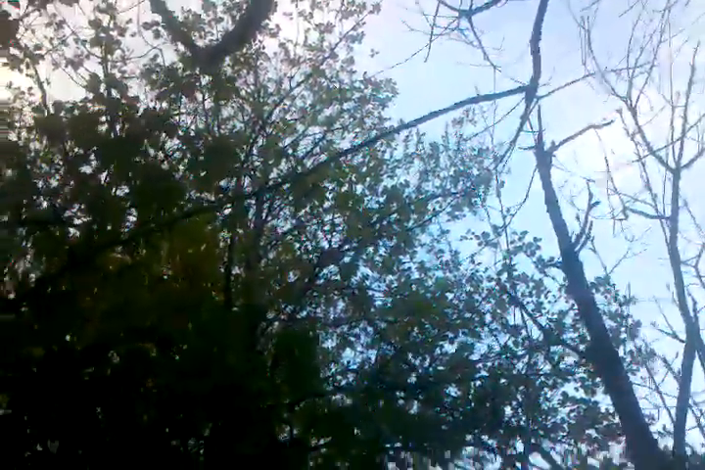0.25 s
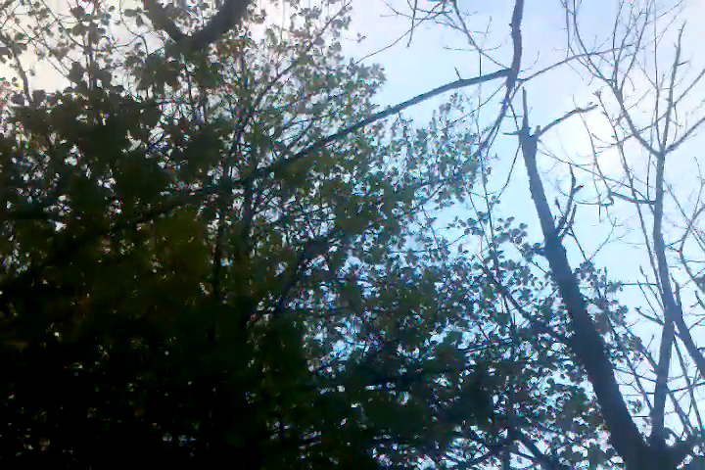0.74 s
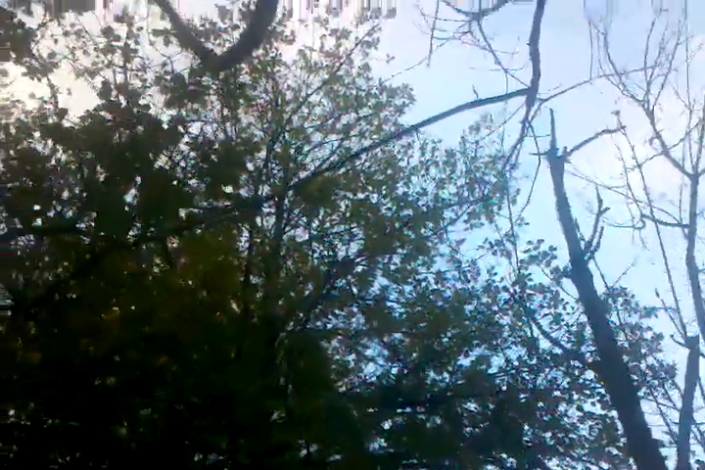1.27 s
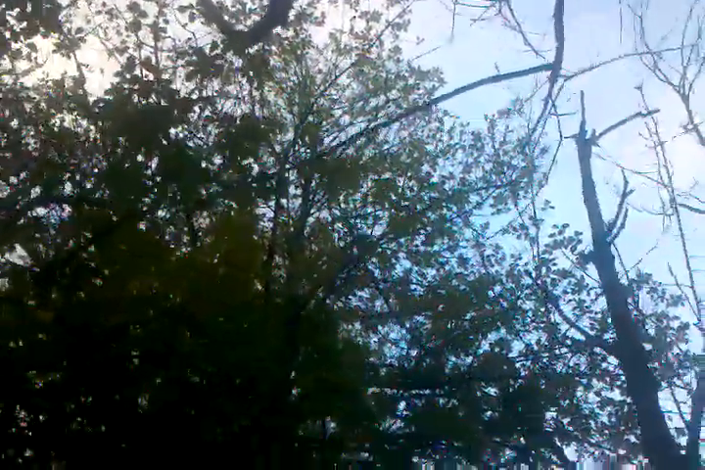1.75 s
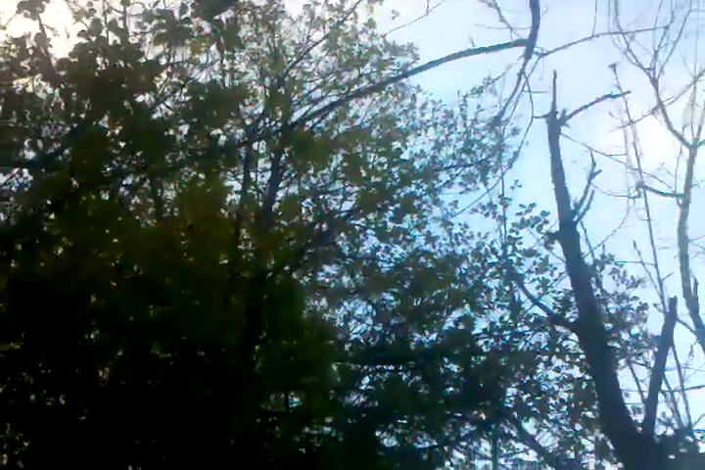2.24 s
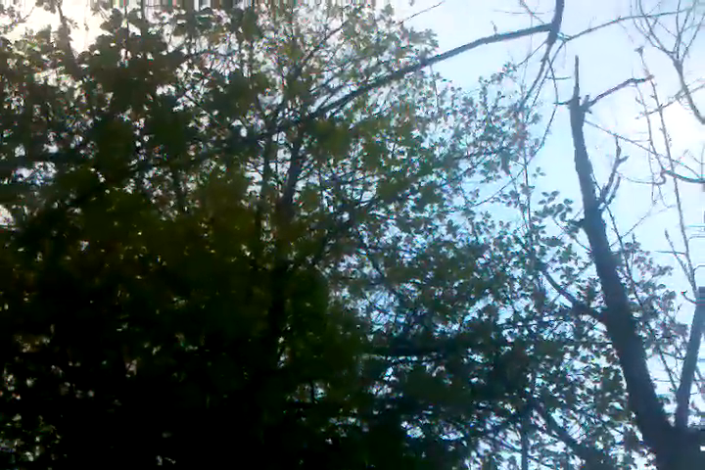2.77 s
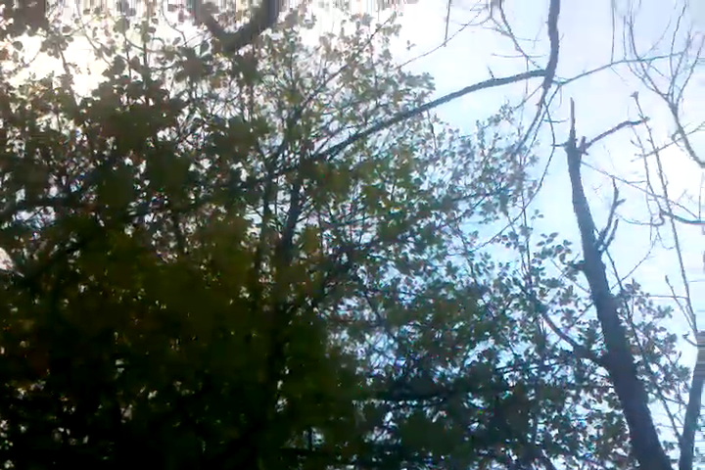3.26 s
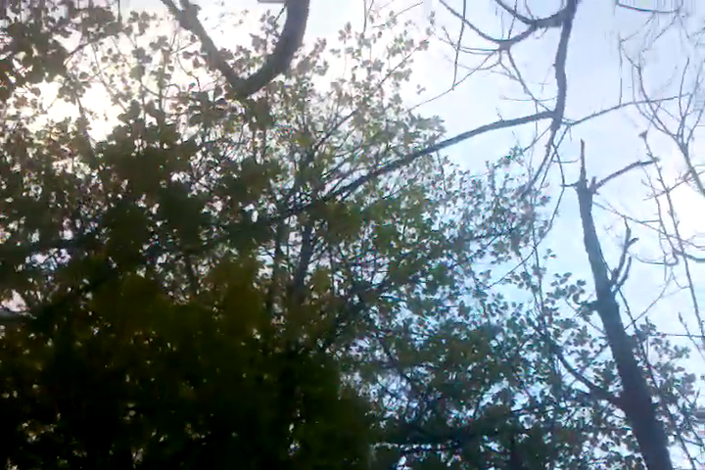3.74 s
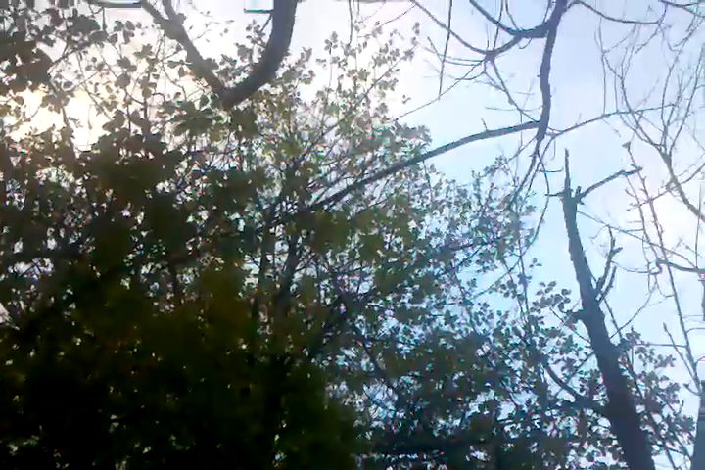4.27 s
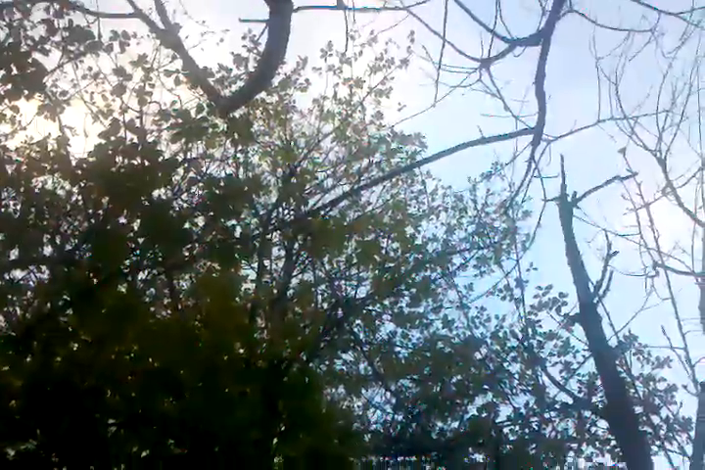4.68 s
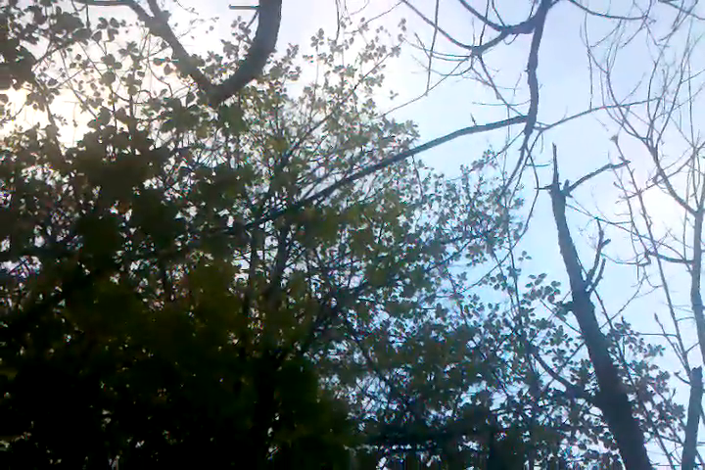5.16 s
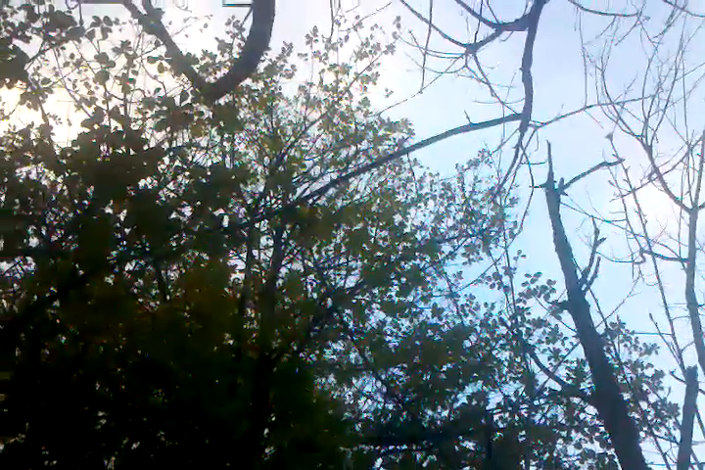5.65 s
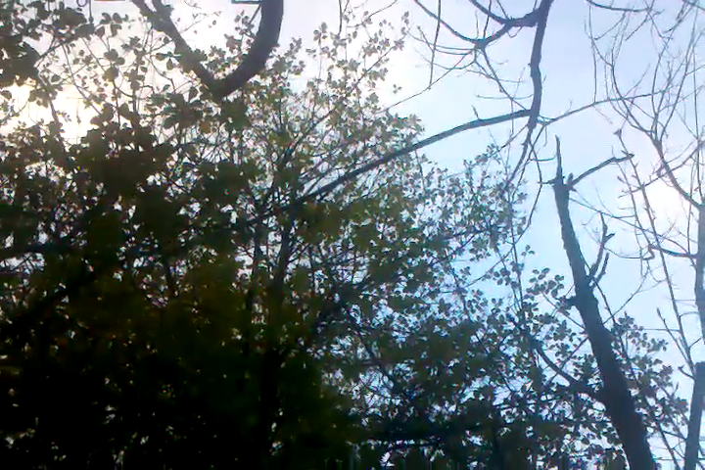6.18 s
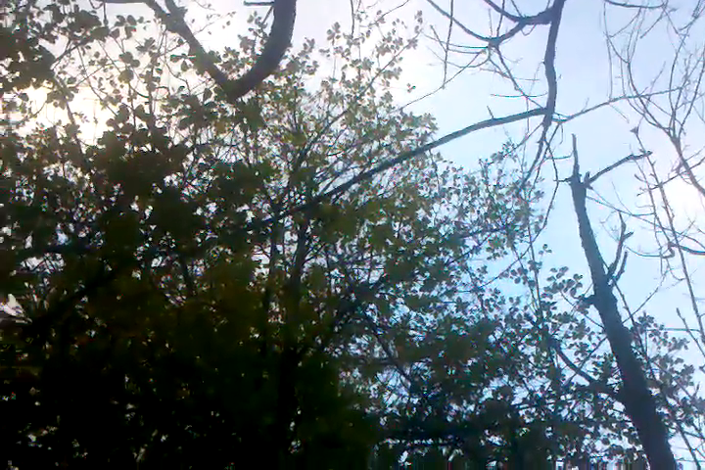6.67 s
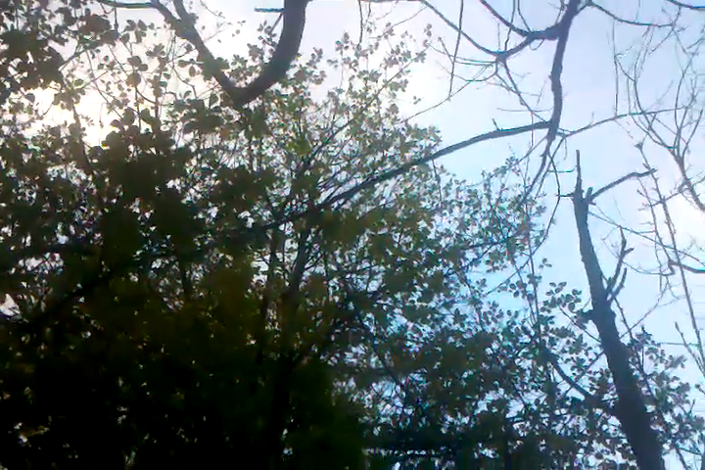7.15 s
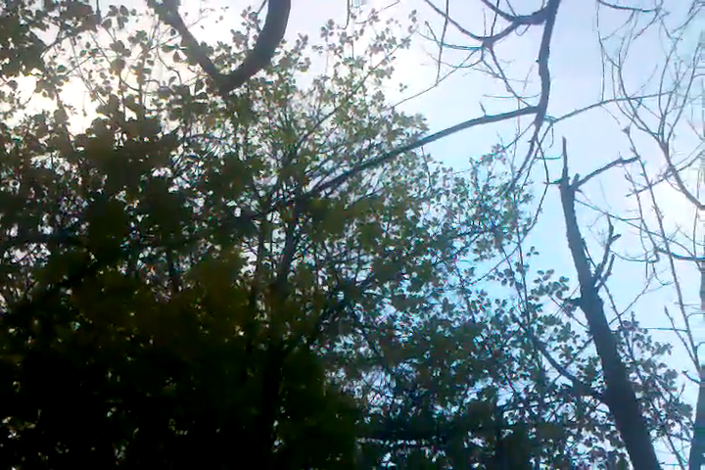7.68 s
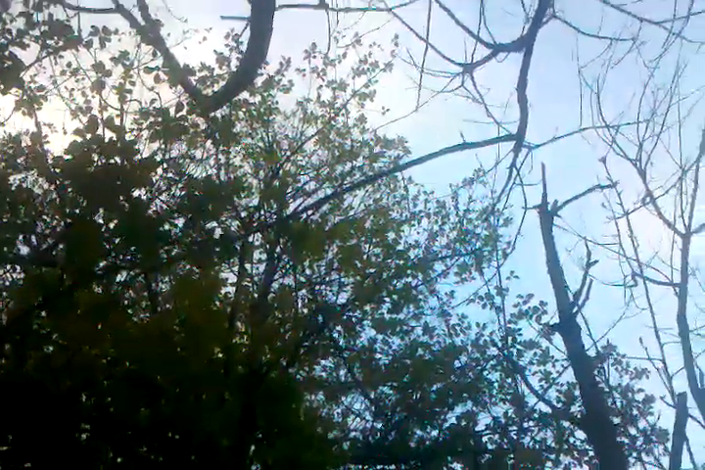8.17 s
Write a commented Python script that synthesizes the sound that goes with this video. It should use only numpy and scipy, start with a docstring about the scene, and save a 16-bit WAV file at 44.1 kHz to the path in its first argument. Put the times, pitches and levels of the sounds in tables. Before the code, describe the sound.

A mockingbird sings close by in a street tree: evenly spaced arched chirps, a pause, quick pairs of throaty buzz and falling sweep, higher steeper pairs, two rapid trills, then separate whistles. Other birds chirp faintly and echo from further off, and a few dry ticks fall close to the microphone. Steady distant traffic rushes throughout over deep rumble and a weak wavering hum.

```python
"""A mockingbird in a street tree sings arches, then pairs of a low buzz and a sweep, pairs of a steep buzz
and a sweep, two trills and last a row of whistles; soft notes join in from the steep pairs on.
Two other birds call from further off and dry ticks fall close by; foliage and houses echo them.
Throughout, far traffic rushes over a deep rumble and a wavering mains hum.
Birds are gliding sines, ticks damped cosines, traffic and rumble filtered noise, the hum a sine."""
import sys
import numpy as np
from scipy import signal
from scipy.fft import rfft, irfft
from scipy.io import wavfile
from scipy.ndimage import uniform_filter1d

SR = 44100
rng = np.random.default_rng(int(sys.argv[2]) if len(sys.argv) > 2 else 0)


def output_pcm(signal):
    """Save a mono or channel-first signal as 16-bit PCM at the path in sys.argv[1].

    Samples are clipped to [-1, 1] before scaling.
    """
    pcm = np.clip(np.atleast_2d(signal).T, -1, 1) * 32767
    wavfile.write(sys.argv[1], SR, np.round(pcm).astype(np.int16))


N = 371322
T = np.arange(N) / SR
TOP_HZ = 6780  # traffic spectrum is flat above; steep low-pass starts here
PLAIN = [(1, 0), (2, -13.5)]  # tone and octave: multiple, level/dB
# throat resonance: f/Hz, level/dB
THROAT = [(1800, -2), (2500, -2), (3500, -1.5), (4000, -1), (4800, 1), (5400, -4.5), (6000, -2.5),
          (7000, -9.5), (8200, -13.5)]


def undb(db):
    """Amplitude ratio of a level in dB."""
    return 10 ** (np.asarray(db) / 20)


def unit(x):
    """Scale to rms 1."""
    return x / np.sqrt(np.mean(x ** 2))


def colour(table, hz):
    """dB of a spectrum table at hz, straight on a log axis."""
    table_hz, table_db = np.transpose(table)
    return np.interp(np.log(hz), np.log(table_hz), table_db)


def walk(rate_hz):
    """Smooth random curve, rms 1, that turns about rate_hz times a second."""
    k = max(int(SR / rate_hz), 1)
    steps = np.repeat(rng.standard_normal(N // k + 1), k)
    return unit(uniform_filter1d(uniform_filter1d(steps, k), k)[:N])


def band(lo_hz, hi_hz):
    """Noise between two edges, rms 1."""
    sos = signal.butter(2, [lo_hz, hi_hz], "band", fs=SR, output="sos")
    return unit(signal.sosfilt(sos, rng.standard_normal(N)))


def echoes(x, near_db, near_t60_s, far_db, far_t60_s):
    """Scattered returns from leaves close by, then a longer wash from the houses."""
    t = T[:SR]
    leaves, houses = rng.standard_normal((2, SR)) * np.clip(t / 0.0007, 0, 1)
    leaves = leaves * undb(-60 * t / near_t60_s)
    houses = houses * undb(-60 * t / far_t60_s)
    room = undb(near_db) * leaves / np.linalg.norm(leaves) + undb(far_db) * houses / np.linalg.norm(houses)
    return signal.fftconvolve(x, room)[:N]


def sing(out, rows, partials, throat, shake, rough, fade_s=0.0011):
    """Add a syrinx tone along rows (t/s, f/Hz, level/dB); roughness shakes its pitch and makes it throb."""
    # throbs quicken with pitch: pitch/Hz, throb rate/Hz
    throb_rates = [(3100, 90), (4200, 210)]
    pitch_shake, throb_shake = shake
    s, hz, db = np.transpose(rows)
    i = np.arange(int(s[0] * SR), min(int(s[-1] * SR), N))
    hz = np.interp(T[i], s, hz)
    throb_hz = np.interp(hz, *np.transpose(throb_rates)) * (1 + .15 * throb_shake[i])
    beat = 2 * np.pi * np.cumsum(throb_hz) / SR
    throb = 1 - np.clip(1.3 * rough, 0, 1) * (1 + np.cos(beat)) / 2
    edge = np.clip(np.minimum(T[i] - s[0], s[-1] - T[i]) / fade_s, 0, 1)
    gain = np.sqrt(2) * undb(np.interp(T[i], s, db)) * throb * edge
    phase = 2 * np.pi * np.cumsum(hz * (1 + .04 * rough * pitch_shake[i])) / SR
    for multiple, part_db in partials:
        out[i] += gain * undb(part_db + colour(throat, multiple * hz)) * np.sin(multiple * phase)


def glide(s, ms, hz0, hz1, db, loudest, ends_db):
    """Rows of a glide that moves fastest early; level curves by ends_db away from the part called loudest."""
    u = np.linspace(0, 1, num=9)
    return np.c_[s + u * ms / 1000, hz0 + (hz1 - hz0) * u ** .8, db + ends_db * (2 * (u - loudest)) ** 2]


def traffic():
    """Noise in half-octave bands that each swell and flicker on their own."""
    # relative density: f/Hz, level/dB
    density = [(18, -55.5), (30, -36), (65, -20), (98, -7.5), (123, 0), (250, -0.5), (532, -5), (984, -0.5),
               (1660, -5.5), (2240, -13.5), (3780, -14), (5570, -15.5), (7000, -19.5), (9100, -52),
               (15400, -120)]
    # rms of the 300-1800 Hz part before slow level changes: t/s, level/dB
    rush_level = [(0.0, -43), (1.43, -41), (1.76, -40.5), (5.09, -42), (7.29, -39.5), (7.76, -40.5),
                  (8.42, -40.5)]
    hz = np.maximum(np.arange(N // 2 + 1) * SR / N, 1)
    spectrum = rfft(rng.standard_normal(N)) * undb(colour(density, np.minimum(hz, TOP_HZ)))
    rush = 0
    for centre_hz in 30 * 2 ** np.arange(0, 8.5, .5):
        share = np.clip(1 - 2 * np.abs(np.log2(hz / centre_hz)), 0, 1)  # triangle, overlaps sum to 1
        rush = rush + irfft(spectrum * share, N) * undb(1.29 * walk(2.997) + 0.54 * walk(14))
    middle = signal.sosfilt(signal.butter(4, [300, 1800], "band", fs=SR, output="sos"), rush)
    return rush / np.std(middle) * undb(np.interp(T, *np.transpose(rush_level)))


def rumble():
    """Deep noise band whose level rises and sinks."""
    # t/s, level/dB
    rumble_level = [(0.0, -76), (0.14, -78), (5.25, -75.5), (6.19, -63.5), (6.82, -75), (7.55, -68),
                    (8.35, -74), (8.42, -67)]
    return band(50, 80) * undb(np.interp(T, *np.transpose(rumble_level)))


def hum():
    """Mains hum: one sine, wavering in pitch and level."""
    mean_hz, mean_db = 117.5, -58
    phase = 2 * np.pi * np.cumsum(mean_hz + 2.67 * walk(9)) / SR
    return np.sqrt(2) * undb(mean_db + 1.9 * walk(8.6)) * np.sin(phase)


def ticks():
    """Small dry ticks close by, each a single push that rings a very short resonance."""
    # t/s, peak before high-pass/dB, f/Hz, damping/Hz (decay rate is 1.5 times this, per s)
    tick_rows = [(0.3583, -15.5, 1000, 1700), (0.3838, -18.5, 4500, 2500), (4.451, -8, 1490, 3000),
                 (6.2355, -15, 4400, 5000), (6.9309, -20.5, 900, 800), (7.0483, -15, 2500, 5000),
                 (7.1628, -24, 6000, 2500), (7.2836, -21, 3300, 2200)]
    out, t = np.zeros(N), T[:400]
    for s, db, hz, damping_hz in tick_rows:
        i = int(s * SR)
        out[i:i + len(t)] += undb(db) * np.exp(-1.5 * t * damping_hz) * np.cos(2 * np.pi * hz * t)
    out = signal.sosfilt(signal.butter(2, 350, "high", fs=SR, output="sos"), out)  # too small to give bass
    return out + echoes(out, -8, .012, -18, .2)


def low_chirps(shake):
    """A neighbour's low chirps, held and then dropped, with strong echo."""
    # t/s, length/ms, held f/Hz, level before throat/dB
    chirps = [(3.927, 28, 2380, -36), (4.155, 30, 2305, -38), (4.73, 33.4, 2465, -32.5),
              (4.945, 26, 2254, -38), (5.554, 29, 2440, -37), (5.795, 56, 2330, -37.5),
              (6.334, 34, 2464, -34.5), (6.928, 42, 2440, -38)]
    # part of length, pitch ratio, level/dB
    chirp_shape = [(-.3, .85, -17), (0, .94, -9), (.3, 1., 0), (.65, 1., -1), (1, .83, -5)]
    out = np.zeros(N)
    part, ratio, shape_db = np.transpose(chirp_shape)
    for s, ms, hz, db in chirps:
        rows = np.c_[s + part * ms / 1000, hz * ratio, db + shape_db]
        sing(out, rows, [(1, 0), (2, -12)], THROAT, shake, .6)
    return out + echoes(out, -.5, .18, -4, .6)


def far_bird(shake):
    """Far chirps and hoarse slides; patchy in level, with more echo than direct sound."""
    # t of crest/s, level before throat/dB
    far_chirps = [(0.784, -39.5), (2.214, -41), (2.31, -45), (3.37, -38.5), (4.651, -36.5), (5.555, -34.5),
                  (7.724, -32.5)]
    # t from crest/ms, f/Hz, level/dB
    far_shape = [(-22, 4200, -17), (0, 5650, -1), (8, 4550, -6), (23, 4250, 0), (36, 4000, -7),
                 (52, 3800, -3), (70, 3400, -7), (82, 3700, -9)]
    # second voice above the fall: length/ms, start f/Hz, end f/Hz, level/dB
    upper_voice = (45, 5501.5, 4997, -6)
    # hoarse slides: t/s, length/ms, start f/Hz, end f/Hz, level before throat/dB
    far_calls = [(0.589, 320, 6610, 5950, -47.5), (.62, 140, 5700, 4940, -45), (.85, 110, 3800, 3710, -45),
                 (2.25, 130, 4110, 3620, -48.5), (3.41, 64, 4230, 3600, -43), (7.759, 50, 4290, 3970, -44),
                 (8.15, 77, 3640, 2526, -48.5)]
    chirps, slides = np.zeros(N), np.zeros(N)
    ms, hz, shape_db = np.transpose(far_shape)
    *upper_glide, upper_db = upper_voice
    slide_rows = [glide(*call, .3, -4) for call in far_calls]
    for s, db in far_chirps:
        rows = np.c_[s + ms / 1000, hz, db + shape_db]
        sing(chirps, rows, [(1, 0)], THROAT, shake, .75, fade_s=.003)
        slide_rows.append(glide(s, *upper_glide, db + upper_db, .3, -4))
    for rows in slide_rows:
        sing(slides, rows, [(1, 0)], THROAT, shake, 0, fade_s=.006)
    slides = slides * (.4 + .9 * walk(2000))  # hoarse: spread into a band of noise
    out = (chirps + slides) * undb(2.5 * walk(90))  # broken into patches
    return out + echoes(out, 0.92, 0.098, -0.5, .45)


def other_birds():
    """Two further singers that reach the street mostly as echo."""
    shake = walk(300), walk(60)
    return low_chirps(shake) + far_bird(shake)


def arch(s, rise_ms, hold_ms, fall_ms, hz0, drift_hz, db):
    """Rows of an arch: quick rise, slightly domed hold, deep fall."""
    # part of the rise, pitch ratio, level/dB
    rise_shape = [(-1, .7, -9), (-.5, .82, -6.5), (0, 1., 1.5)]
    # part of the fall, pitch ratio, level/dB
    fall_shape = [(0, .985, 1.5), (.22, .95, .8), (.62, .69, -1.5), (1, .44, -7)]
    hz1 = hz0 + drift_hz
    up = [(s + part * rise_ms / 1000, hz0 * ratio, db + part_db) for part, ratio, part_db in rise_shape]
    dome = [(s + hold_ms / 2000, 1.025 * (hz0 + hz1) / 2, db)]
    down = [(s + (hold_ms + part * fall_ms) / 1000, hz1 * ratio, db + part_db)
            for part, ratio, part_db in fall_shape]
    return up + dome + down


def arches(out, shake):
    """Arched notes: harmonics 2 to 5 of a fundamental that is itself absent."""
    # t where rise levels off/s, rise/ms, hold/ms, fall/ms, lower tone f/Hz, drift over hold/Hz,
    # level before throat/dB, upper tone (a fifth above)/dB
    arch_rows = [(.094, 11, 9.1, 30, 2710, 46, -36.5, -.6), (.25, 11, 7.7, 20.5, 2705, 58, -38.5, -2),
                 (0.409, 14, 10.5, 27, 2666, 42.5, -36, 2), (0.562, 10.3, 11, 30, 2914, -60.5, -34, -2.5),
                 (.718, 14, 11, 22, 2830, 40, -33.5, -2), (.898, 8, 12.4, 31, 3090, 61, -34, -9.5),
                 (1.075, 13.2, 17, 30, 3190, 32, -34, 2.5), (1.227, 16, 15.5, 33, 3090, 81, -32, 1),
                 (1.407, 18, 16, 26, 3156, 70, -32, 2.5), (1.581, 18.6, 18.8, 23.5, 3525, 235.5, -29, -1),
                 (1.749, 17, 15.3, 21, 3540, -230, -27.5, 3.5),
                 (1.938, 22.5, 13.8, 30, 3113, 100, -32.5, 0.8),
                 (2.118, 21.5, 13.6, 34, 3110, 130, -35.5, 1.1)]
    # narrower throat resonance: f/Hz, level/dB
    arch_throat = [(1700, -19), (2200, -7), (2800, -1.5), (3600, 0), (4250, -3), (4800, -16), (5500, -20),
                   (6500, -10), (8000, -16)]
    high_db = -4.5
    for *shape, upper_db in arch_rows:
        partials = [(1, 0), (3 / 2, upper_db), (2, high_db), (5 / 2, high_db)]
        sing(out, arch(*shape), partials, arch_throat, shake, .25)


def sweep(out, shake, *note):
    """Clear falling tone, loudest midway."""
    sing(out, glide(*note, 0.51, -10.0), PLAIN, THROAT, shake, .1)


def low_pairs(out, shake):
    """Low throbbing buzz, short gap, clear falling sweep."""
    # t of sweep/s, buzz/ms, buzz level/dB, sweep start f/Hz, sweep end f/Hz, sweep level/dB; before throat
    pairs = [(2.987, 34, -28.5, 4500, 2800, -26), (3.121, 50, -28.5, 4800, 2840, -24),
             (3.242, 47, -28, 4730, 2800, -23.5), (3.367, 41, -26.5, 4750, 2900, -21),
             (3.498, 41, -27.5, 4480, 3100, -24.5), (3.638, 45, -24.5, 4740, 2960, -22)]
    buzz_hz, climb_hz_per_ms, gap_ms, sweep_ms = 2661, 9, 4.5, 28
    for s, ms, buzz_db, *fall in pairs:
        start_s, top_hz = s - (ms + gap_ms) / 1000, buzz_hz + climb_hz_per_ms * ms
        sing(out, glide(start_s, ms, buzz_hz, top_hz, buzz_db, 0.66, -8), PLAIN, THROAT, shake, 0.67)
        sweep(out, shake, s, sweep_ms, *fall)


def high_pairs(out, shake):
    """Steep throbbing buzz up, clear sweep down at once."""
    # t of sweep/s, buzz/ms, buzz start f/Hz, buzz top f/Hz, sweep/ms, sweep start f/Hz,
    # buzz level/dB, sweep level/dB; before throat
    pairs = [(4.316, 23, 3750, 5150, 32, 4740, -33.5, -26), (4.434, 37, 3780, 5390, 25, 4710, -29.5, -24),
             (4.543, 35, 4410, 5220, 22, 4960, -29.5, -27.5),
             (5.115, 34, 3730, 5390, 27, 4630, -32.5, -27.5), (5.223, 40, 4140, 5930, 22, 5240, -29, -24.5),
             (5.358, 33, 4040, 5800, 19, 5200, -27, -24)]
    sweep_end_hz = 3085
    for s, ms, hz0, top_hz, sweep_ms, sweep_hz, buzz_db, sweep_db in pairs:
        sing(out, glide(s - ms / 1000, ms, hz0, top_hz, buzz_db, 0.62, 1), PLAIN, THROAT, shake, .8)
        sweep(out, shake, s, sweep_ms, sweep_hz, sweep_end_hz, sweep_db)


def soft_notes(out, shake):
    """Short soft glides between the figures, from nearly clear to rough."""
    # t/s, length/ms, start f/Hz, end f/Hz (both sound 1 % lower), level before throat/dB, roughness 0-1
    notes = [(4.24, 35, 3300, 3480, -44.5, 0.8), (5.051, 41, 3900, 3650, -41.5, .9),
             (5.925, 42, 3200, 3900, -41, .8), (6.315, 17, 2820, 3350, -42, .3),
             (6.51, 21, 4150, 4550, -39, .4), (7.388, 55, 2030, 2020, -37.5, .2),
             (7.472, 45, 3950, 3400, -40, .7), (7.52, 14, 2500, 2490, -39, .15),
             (7.876, 44, 1950, 1990, -36.5, 0.2), (7.918, 53, 2060, 2174, -40, 0.25),
             (8.036, 19, 3000, 2670, -38, .15)]
    for *note, rough in notes:
        sing(out, glide(*note, .4, -4), [(0.99, 0)], THROAT, shake, rough)


def trill(s, swing_ms, crest0_hz, crest1_hz, trough_hz, db, loudest, start_db, end_db, count):
    """Rows of a trill: a leap up, then swings with narrow sinking crests and round troughs."""
    upstroke_ms, upstroke_hz, closing_lift_hz = 12, 4330, 457  # the last trough stays higher
    pitch_stray, level_stray_db = .018, 1.5  # rms
    turns = np.arange(-upstroke_ms / swing_ms, count - .15, 1 / 24)
    part = np.clip(turns / count, 0, 1)
    height = np.minimum(1.12 * np.abs(2 * (turns % 1) ** .92 - 1) ** 1.9, 1)
    low_hz = trough_hz + closing_lift_hz * np.clip(turns - count + 1.5, 0, 1)
    hz = low_hz + (crest0_hz + (crest1_hz - crest0_hz) * part - low_hz) * height
    leap_hz = crest0_hz + (crest0_hz - upstroke_hz) * turns * swing_ms / upstroke_ms
    hz = np.where(turns < 0, leap_hz, hz)
    swell_db = np.where(part < loudest, start_db * (1 - part / loudest) ** 2,
                        end_db * ((part - loudest) / (1 - loudest)) ** 2)
    time_s = s + turns * swing_ms / 1000
    i = (time_s * SR).astype(int)
    return np.c_[time_s, hz * (1 + pitch_stray * walk(30)[i]), db + swell_db + level_stray_db * walk(45)[i]]


def trills(out, shake):
    """Two trills, the pitch swinging fast between crest and trough."""
    # t of first crest/s, swing/ms, first crest f/Hz, last crest f/Hz, trough f/Hz (before stray),
    # peak before throat/dB, loudest part, start level/dB, end level/dB
    trill_rows = [(6.003, 31, 6130, 5080, 3365, -29, 0.67, -7.5, -9),
                  (6.535, 29.7, 6265, 5770, 3413, -25, 0.48, -6.5, -5)]
    # swings in each trill
    swings = (7, 9)
    for row, count in zip(trill_rows, swings):
        sing(out, trill(*row, count=count), PLAIN, THROAT, shake, .1)


def whistle(s, hz0, peak_hz, hz1, knee, rise_db, peak_db, fall_db, tail_ms):
    """Rows of a whistle: up over a knee to a point, down and a fading level tail."""
    # t from peak/ms, part of the way down, level/dB
    fall_shape = [(5, 0.22, -0.5), (11.04, 0.69, -2), (21.1, 1, -11)]
    climb_ms, knee_ms, start_db, tail_db = 24, 9.57, -12, -5  # times before the peak
    up = [(s - climb_ms / 1000, hz0, rise_db + start_db),
          (s - knee_ms / 1000, hz0 + knee * (peak_hz - hz0), rise_db),
          (s, peak_hz, peak_db)]
    down = [(s + ms / 1000, peak_hz + part * (hz1 - peak_hz), fall_db + db) for ms, part, db in fall_shape]
    end_s, _, end_db = down[-1]
    return up + down + [(end_s + tail_ms / 1000, hz1, end_db + tail_db)]


def whistles(out, shake):
    """Peaked whistles, almost clear."""
    # t of peak/s, start f/Hz, peak f/Hz, end f/Hz, part of climb done at knee,
    # rise level/dB, peak level/dB, fall level/dB (before throat), tail/ms
    whistle_rows = [(7.315, 2470, 3170, 2040, .5, -34, -30, -32, 24),
                    (7.565, 2710, 3810, 2410, 0.21, -23, -30, -31, 28),
                    (7.85, 2785, 3410, 1910, 0.44, -29.5, -31, -33, 12),
                    (8.091, 2750, 3530, 2590, .65, -23.5, -25, -24, 17),
                    (8.402, 2770, 3320, 2200, .4, -35, -32, -36, 5)]
    for row in whistle_rows:
        sing(out, whistle(*row), PLAIN, THROAT, shake, .15)


def mockingbird():
    """All phrases of the near singer, with returns from limbs, leaves and houses."""
    # single returns from limbs and trunk: delay/ms, level/dB
    branches = [(2.4, -14.5), (3.7, -7), (5.3, -20.5), (11.3, -18), (13.8, -17)]
    out, shake = np.zeros(N), (walk(420), walk(60))
    for phrase in (arches, low_pairs, high_pairs, soft_notes, trills, whistles):
        phrase(out, shake)
    limbs = sum(undb(db) * np.roll(out, int(ms * SR / 1000)) for ms, db in branches)
    return out + limbs + echoes(out, -6.5, 0.086, -12.5, 0.64)


def scene():
    """Street, ticks and birds, one channel."""
    street = traffic() + rumble() + hum()
    return (street + ticks() + other_birds() + mockingbird())[None]


def record(dry):
    """Steep low-pass from 6780 Hz, a faint shelf above it, and a second cut at 9150 Hz."""
    edge_hz = 9150
    shelf = signal.ellip(5, .5, 35, TOP_HZ, fs=SR, output="sos")
    edge = signal.ellip(8, .5, 60, edge_hz, fs=SR, output="sos")
    return signal.sosfilt(np.vstack([shelf, edge]), dry)


dry = scene()
out = record(dry)
output_pcm(out)
```